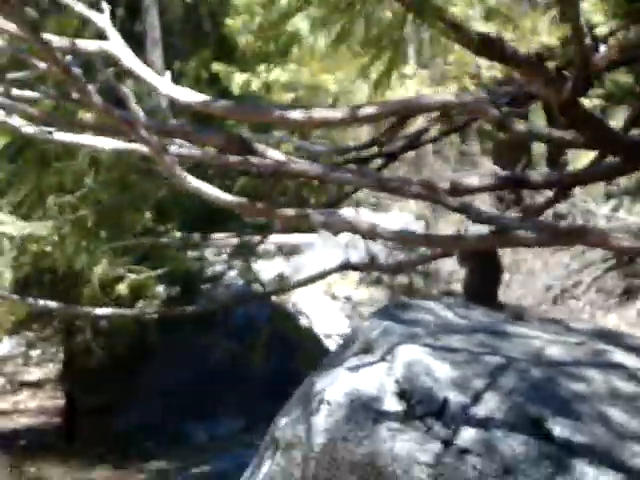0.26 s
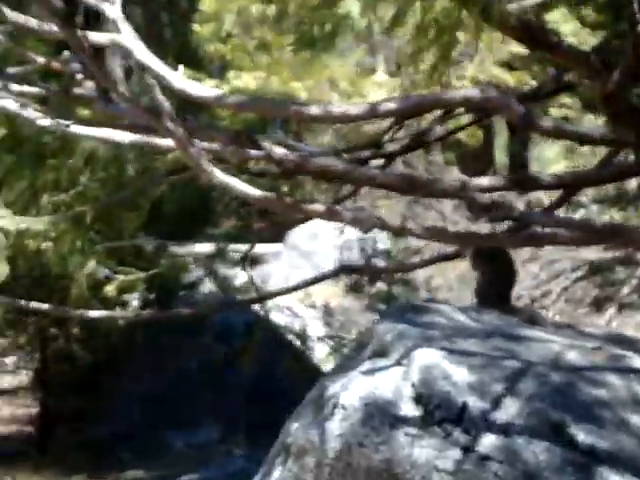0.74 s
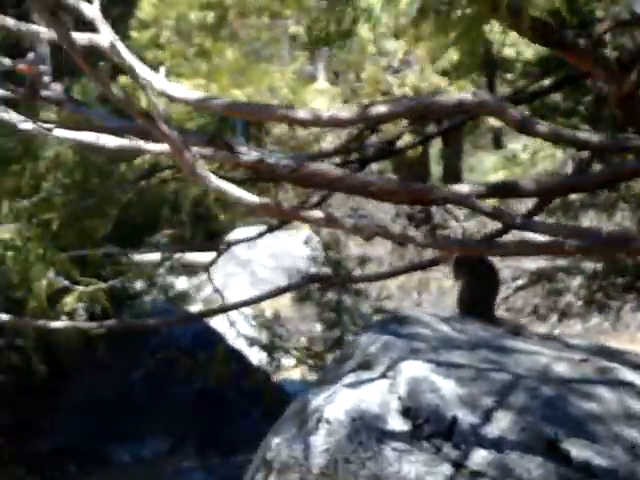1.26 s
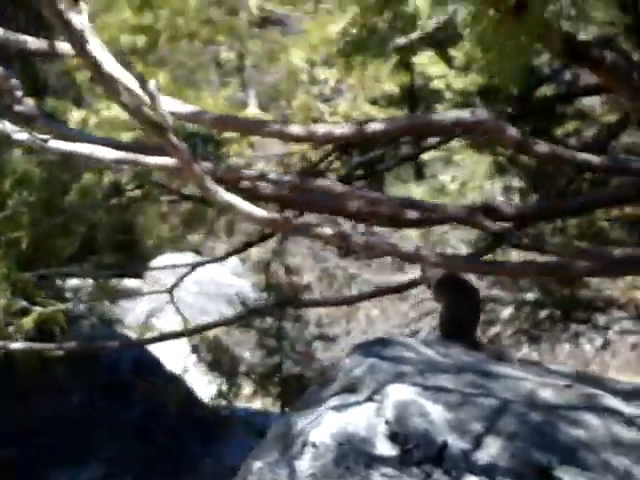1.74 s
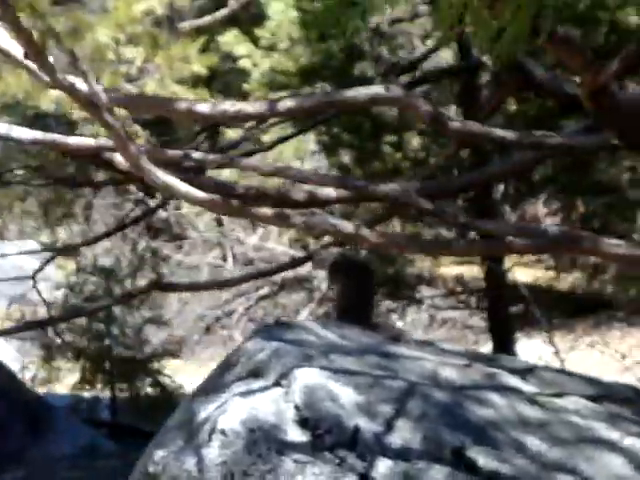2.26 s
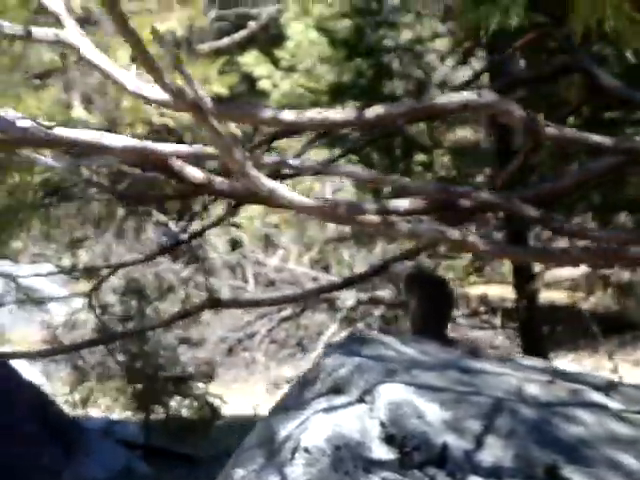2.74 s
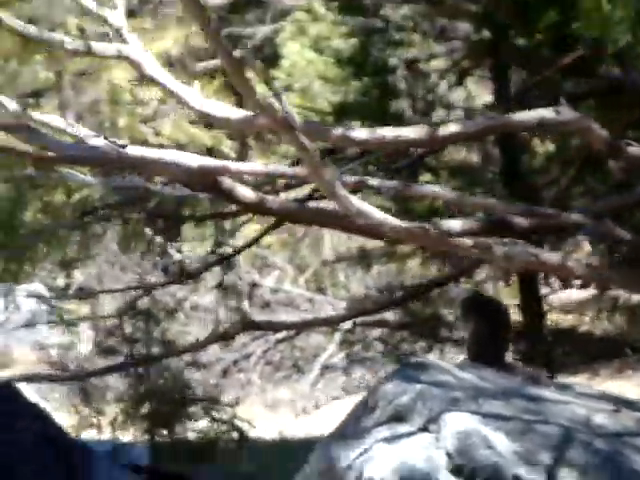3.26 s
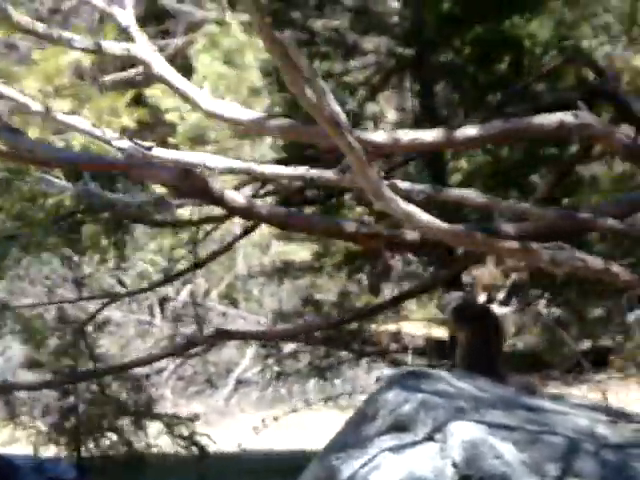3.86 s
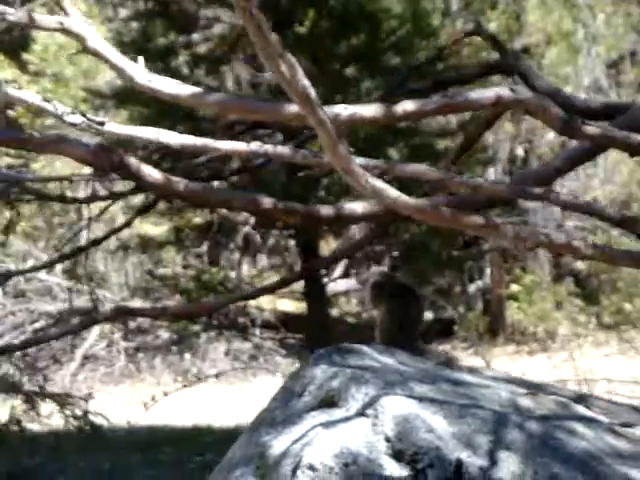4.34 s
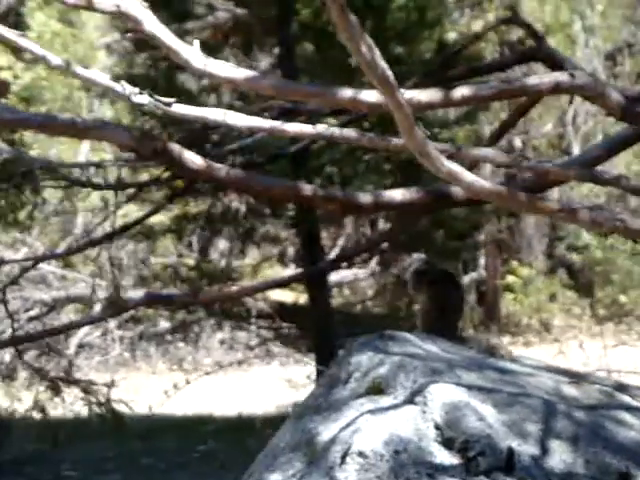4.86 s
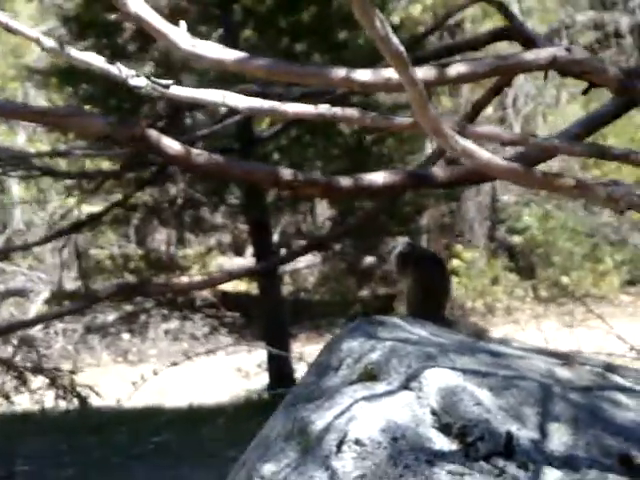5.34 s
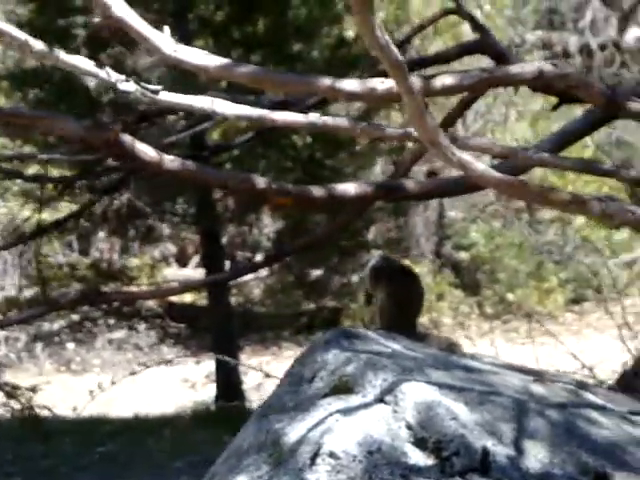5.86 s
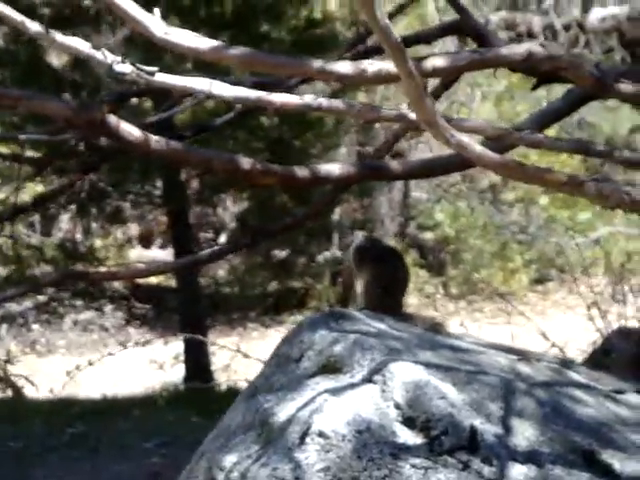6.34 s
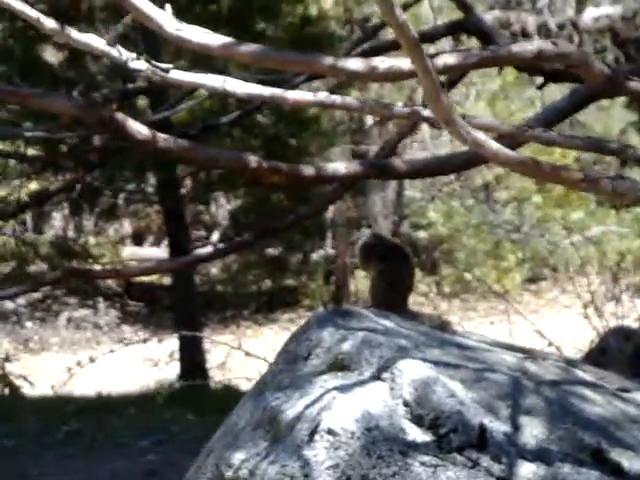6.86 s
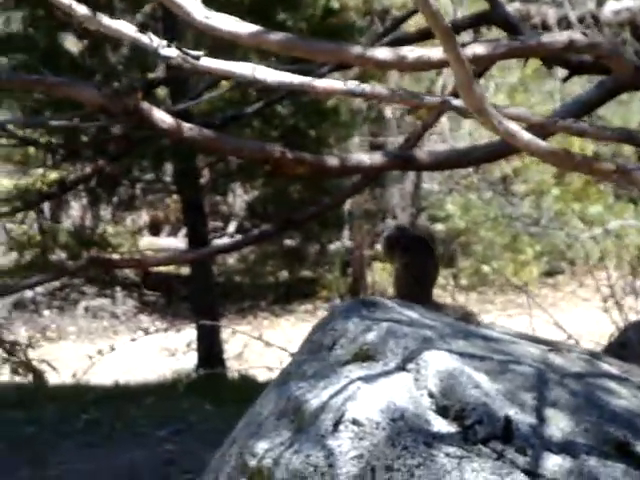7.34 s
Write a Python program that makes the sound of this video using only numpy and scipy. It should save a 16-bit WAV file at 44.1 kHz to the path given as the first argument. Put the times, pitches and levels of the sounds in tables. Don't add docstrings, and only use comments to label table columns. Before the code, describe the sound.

Harsh squirrel chirps come steadily, about every seven tenths of a second, in breezy woods; fingers knock the casing, and far birds scold and caw.

```python
import sys
import numpy as np
from scipy import signal
from scipy.fft import rfft, irfft, next_fast_len
from scipy.io import wavfile
from scipy.ndimage import uniform_filter1d, map_coordinates

SR = 44100
rng = np.random.default_rng(int(sys.argv[2]) if len(sys.argv) > 2 else 0)


def transcribe(u):
    v = np.clip(np.atleast_2d(u).T, -1, 1)
    q = np.round(v * 32767).astype(np.int16)
    wavfile.write(sys.argv[1], SR, q)


def decibels_to_gain(level_db):
    exponent = np.asarray(level_db, float) / 20
    return 10 ** exponent


N = 335160


def unit(x):
    return x / np.sqrt(np.mean(x ** 2) + 1e-20)


def along(points, hz):
    f, value = np.transpose(points)
    return np.interp(np.log(hz + 1), np.log(f + 1), value)


def wobble(rate, size=N):
    knots = rng.standard_normal(size // 40 + 9)
    return map_coordinates(knots, [np.arange(size) * rate / SR], order=2)


def patches(shape, depth_db, size):
    smooth = uniform_filter1d(rng.standard_normal(shape), size[0], 0)
    smooth = uniform_filter1d(smooth, size[1], 1)
    return decibels_to_gain(depth_db * unit(smooth))


def filtered(x, response):
    m = next_fast_len(len(x) + 4096)
    spectrum = rfft(x, m) * response(np.fft.rfftfreq(m, 1 / SR))
    return irfft(spectrum, m)[:len(x)]


def resonances(modes):
    def response(f):
        total = 0
        for k, (centre, width, db) in enumerate(modes):
            peak = 1j * f * width / (centre * centre - f * f + 1j * f * width)
            total = total + (-1) ** k * decibels_to_gain(db) * peak
        return total
    return response


def hoarse(rate, jitter, gating, noise, size=N):
    phase = np.cumsum(rate / SR * np.exp(jitter * wobble(rate, size=size)))
    pulses = np.diff(np.floor(phase), prepend=0) * decibels_to_gain(4.8 * rng.standard_normal(size))
    puffs = rng.standard_normal(size) * np.exp(-gating * (phase % 1))
    share = np.clip(noise, 0, 1)
    return np.sqrt(1 - share) * unit(pulses) + np.sqrt(share) * unit(puffs)


def add(track, s, sound):
    part = track[round(s * SR):][:len(sound)]
    part += sound[:len(part)]


# time in seconds, strength in dB.
BREEZE = [(0.0, -52.5), (3.41, -52), (3.77, -49.5), (4.13, -52), (6.65, -51), (6.88, -52), (7.41, -51.5),
          (7.6, -50)]
# frequency in Hz, density in dB per Hz.
PINES = [(26, -50), (66, -11), (85, -17), (230, -6), (520, -3), (1050, -5.5), (2600, -18), (6000, -28.5)]
# frequency in Hz, density in dB per Hz.
HISS = [(600, -30.5), (2500, -1), (5450, 1.5), (9920, -3.5), (10500, -58)]
HISS_DB = -62


def breeze():
    z = signal.stft(rng.standard_normal(N), nperseg=512)[2]
    patchy = signal.istft(z * patches(z.shape, 1.17, size=(5, 9)), nperseg=512)[1][:N]
    air = filtered(patchy, lambda f: decibels_to_gain(along(PINES, f)))
    hiss = filtered(rng.standard_normal(N), lambda f: decibels_to_gain(along(HISS, f)))
    s, db = np.transpose(BREEZE)
    strength_db = np.interp(np.arange(N) / SR, s, db) + 1.0 + 0.14 * wobble(3.17)
    return decibels_to_gain(strength_db) * unit(air) + decibels_to_gain(HISS_DB) * unit(hiss)


# frequency in Hz, time to fall 60 dB in seconds.
TREES = [(1000, 0.87), (3000, 0.52), (9000, 0.21)]


def forest(x):
    wet, half = np.zeros(N), SR // 2
    for start in range(0, N, half):
        hz, t, z = signal.stft(rng.standard_normal(half), SR, nperseg=256)
        decay = decibels_to_gain(-60 * t / along(TREES, hz)[:, None])
        tail = signal.istft(z * decay, SR, nperseg=256)[1]
        echo = signal.fftconvolve(x[start:start + half], tail / np.linalg.norm(tail))
        add(wet, start / SR + .006, echo)
    return wet


# middle in seconds, level in dB, length in seconds.
CAWS = [
    (4.84, -49, 0.046),
    (5.293, -51.5, 0.19),
    (5.803, -54.5, 0.16),
    (6.258, -54.5, 0.13),
    (6.728, -53, 0.1),
]
# resonance in Hz, width in Hz, level in dB.
CROW = [(1280, 155, 3), (1613, 60, 5)]


def crow():
    t = np.arange(N) / SR
    shape = sum(decibels_to_gain(db) * np.exp(-np.abs(2 * (t - s) / length) ** 3) for s, db, length in CAWS)
    voice = filtered(hoarse(340, .03, 1.5, 0.18), lambda f: resonances(CROW)(f) ** 2)
    return shape * unit(voice)


# start in seconds, peak in dB, ring in Hz, ring length in cycles, crack in dB.
TICKS = [(1.471, -37, 1140, 3.3, -3), (1.4894, -34, 1310, 1.8, -9), (1.5015, -26, 1030, 0.79, -4),
         (1.554, -36, 900, 1.3, -1.5), (1.641, -38, 2100, 3.6, -3), (1.665, -38, 4300, 2.1, -10),
         (1.7951, -10, 1130, 1.86, -22.5), (1.803, -29, 1400, 3.3, -7), (1.835, -37, 1980, 2.4, -9),
         (2.693, -36, 2800, 5.5, -11), (2.729, -41, 815, 4.4, 0), (2.754, -41.5, 2200, 3, -6),
         (2.832, -49, 700, 1.9, 5.5), (4.953, -36.5, 1040, 6.2, -20), (5.561, -37.5, 2400, 2.8, -15),
         (6.358, -46, 1030, 8.2, -16), (6.466, -37, 1110, 3.9, -30)]
# start in seconds, peak in dB, ring in Hz, ring length in cycles.
THUMPS = [(1.4, -43.5, 420, 14), (1.414, -46, 436, 6.5), (2.328, -46, 90, 4), (2.46, -46, 91, 7.5),
          (2.618, -35, 114, 1.5), (3.809, -45, 130, 3.2), (5.16, -40.5, 81, 2.6), (6.485, -40.5, 162, 7),
          (6.504, -38, 400, 3.2)]
SOFT_CRACK_DB = -60


def handling():
    track, t = np.zeros(N), np.arange(SR // 8) / SR
    bumps = [(*row, SOFT_CRACK_DB) for row in THUMPS]
    for s, db, hz, cycles, crack_db in TICKS + bumps:
        u = t * hz / cycles
        ring = np.sin(2 * np.pi * hz * t) * (1 - np.exp(-12 * u)) * np.exp(-3 * u)
        noise = filtered(rng.standard_normal(len(t)), lambda f: resonances([(3300, 4500, 0)])(f) ** 3)
        crack = decibels_to_gain(crack_db - 60 * t / 0.0037) * noise
        thin = filtered(crack - ring, lambda f: (1j * f / (.3 * hz + 1j * f)) ** 3)
        add(track, s - .0003, decibels_to_gain(db + 9.0) * thin)
    return filtered(track, lambda f: (1j * f / (130 + 1j * f)) ** 3)


# start in seconds, length in seconds, level in dB, brightness in dB per octave, beak tuning (1 = rest).
SCOLDS = [
    (3.478, 0.25, -37, -1.5, 1.01),
    (3.825, 0.27, -38.5, 0.5, 0.974),
    (4.198, 0.27, -38, -1.5, 0.97),
    (4.595, 0.25, -39, -2.5, 0.97),
    (4.965, 0.29, -39.5, -2.5, 0.96),
]
# open in Hz, shut in Hz, width in Hz, open level in dB, shut level in dB.
BEAK = [(1930, 2170, 480, -6.5, -7), (2680, 2560, 830, -12, -10.5), (3790, 3290, 390, -10.5, -3.5),
        (4400, 4080, 800, -3, -10), (5000, 4930, 780, -6, -8.5), (5750, 5700, 500, -7, -13),
        (6800, 6400, 1500, -7, -20)]
SWELL_DB, SWELL_SHARE, SWELL_CURVE = 22, .62, 2.1
SHUT_SHARE = 0.79
RELEASE_DB_PER_S = 485


def jay():
    start, size = SCOLDS[0][0] - .05, 2 * SR
    hz, t, z = signal.stft(hoarse(330, 0.59, 0.37, 0.96, size=size), SR, nperseg=512)
    f, power = hz[:, None] + 1, 0
    for s, length, db, bright_db, tuning in SCOLDS:
        since = t + start - s
        to_climb = np.clip(1 - since / (SWELL_SHARE * length), 0, 3)
        release_db = RELEASE_DB_PER_S * np.clip(since - length, 0, 1)
        effort_db = db - SWELL_DB * to_climb ** SWELL_CURVE - release_db
        shut = np.clip(since / (SHUT_SHARE * length), 0, 1)
        for open_hz, shut_hz, width, open_db, shut_db in BEAK:
            centre = tuning * (open_hz + (shut_hz - open_hz) * shut)
            peak = 1 / (1 + ((f - centre ** 2 / f) / width) ** 2) ** 1.59
            tone_db = open_db + (shut_db - open_db) * shut + bright_db * np.log2(centre / 3300)
            power = power + decibels_to_gain(2 * (effort_db + tone_db)) * peak / peak.mean(axis=0)
    edge = 1 / (1 + (1650 / f) ** 8)
    gain = np.sqrt(power) * edge * patches(z.shape, 2.0, size=(3, 22))
    track = np.zeros(N)
    add(track, start, signal.istft(z * gain, SR, nperseg=512)[1])
    return track


# resonance in Hz, width in Hz, level in dB.
THROAT = [(2200, 420, -6.5), (2876, 380, 0.5), (3356, 423, 3), (4096, 590, -1), (5070, 510, -1),
          (5924, 230, -3), (6414, 340, -5), (9300, 2900, -11)]
LOW_EDGE_HZ = 2550


def rasps(events, lead):
    track, t = np.zeros(N), np.arange(SR // 10) / SR
    for s, db, length, bright_db, tuning in events:
        source = hoarse(520, .4, 1.2, .88, size=len(t))

        def voiced(shift):
            throat = resonances([(hz * tuning * shift, width, level) for hz, width, level in THROAT])

            def response(f):
                tilt = decibels_to_gain(bright_db * np.log2(f / 3300 + 0.011))
                mouth = 1 / (1 + (LOW_EDGE_HZ / (f + 1)) ** 6) / (1 + (f / 7000) ** 2)
                return tilt * mouth * throat(f) ** 2
            return unit(filtered(source, response))

        wide, narrow = voiced(1.04), voiced(.94)
        closing = np.clip(t / (1.62 * length), 0, 1)
        sliding = np.sqrt(1 - closing) * wide + np.sqrt(closing) * narrow
        swell = np.clip(t / lead, 0, 1)
        sag = decibels_to_gain(-7 * (t / length) ** 1.12)
        shape = swell ** 1.85 * sag / (1 + np.exp((t - lead - length) / 0.0019))
        spent = 1 / (1 + np.exp((t - 2.4 * length) / .005))
        breath = decibels_to_gain(-23.5) * swell * spent
        add(track, s - lead, decibels_to_gain(db - 4.5) * (shape + breath) * sliding)
    return track


# start in seconds, peak in dB, length in seconds.
CHUCKS = [(0.35, -31, 0.023), (0.403, -45, 0.032), (1.101, -33, 0.027), (1.1513, -38, 0.018),
          (1.842, -29, 0.0094), (1.882, -44.5, 0.023), (2.535, -33.5, 0.019), (2.587, -38, 0.012),
          (3.168, -23, 0.014), (3.228, -41, 0.022), (3.882, -24.5, 0.018), (4.6177, -26, 0.023),
          (5.392, -26.5, 0.018), (5.448, -38, 0.017), (6.1363, -28, 0.023), (6.2016, -31.5, 0.025),
          (6.818, -26, 0.019), (6.889, -35.5, 0.011), (7.5815, -28.5, 0.014)]
CHUCK_BRIGHT_DB, CHUCK_TUNING = -10.5, 0.94


def chucks():
    return rasps([(*row, CHUCK_BRIGHT_DB, CHUCK_TUNING) for row in CHUCKS], lead=0.004)


# time of its top in seconds, level in dB, pitch in Hz, rise in seconds, fall in seconds.
WHISTLES = [(0.288, -24.5, 2930, 0.013, 0.0084), (1.036, -25, 2910, 0.0095, 0.012),
            (1.771, -27, 2850, 0.013, 0.018), (2.463, -26, 2980, 0.0091, 0.019),
            (3.1, -23.5, 2986, 0.017, 0.01), (3.809, -20.5, 3115, 0.028, 0.014),
            (4.542, -23.5, 3306, 0.024, 0.015), (5.32, -27.5, 2927, 0.036, 0.015),
            (6.067, -29, 3004, 0.04, 0.022), (6.733, -25.5, 3225, 0.043, 0.013),
            (7.512, -25.5, 2967, 0.014, 0.01)]
ROUGHNESS = [.02, .14, .14, .2, .02, .1, .14, .18, .2, .28, .1]
# multiple of the pitch, level in dB.
OVERTONES = [(2, -19.5), (3, -29)]


def whistles():
    track, t = np.zeros(N), np.arange(-SR // 25, SR // 20) / SR
    size = len(t)
    for (s, db, hz, rise, fall), rough in zip(WHISTLES, ROUGHNESS):
        climb = .3 * (1 - 3 * rough) * np.clip(-t / .021, 0, 1.3) ** 1.8
        sag = .075 * np.clip(t / .022, 0, 2) ** 1.3
        pitch = hz * (1 - climb - sag) * (1 + .1 * rough * wobble(500, size=size))
        phase = 2 * np.pi * np.cumsum(pitch) / SR
        tone = np.sin(phase)
        for k, level in OVERTONES:
            ragged = decibels_to_gain(3 * wobble(250, size=size)) * np.sin(k * phase + .9 * wobble(500, size=size))
            tone = tone + decibels_to_gain(level) * ragged
        rising, falling = np.exp(-np.abs(t / rise) ** 1.2), np.exp(-np.abs(t / fall) ** 2.1)
        swell = np.where(t < 0, rising, falling) * np.clip(1 + t / .03, 0, 1) ** .5
        flutter_db = 13 * rough * wobble(300, size=size)
        add(track, s + t[0], decibels_to_gain(db + flutter_db) * swell * tone)
    return track


# start in seconds, peak in dB, length in seconds, brightness in dB per octave, throat tuning (1 = rest).
RASPS = [(0.2450, -14.5, 0.028, -7, 0.983), (0.9937, -17, 0.037, -7, 0.948), (1.7316, -14, 0.03, -8, 0.96),
         (2.4264, -14.5, 0.035, -6.5, 0.936), (3.0577, -12.5, 0.025, -6, 0.966),
         (3.771, -14, 0.034, -6.5, 1.005), (4.5024, -14.5, 0.037, -7, 1.033),
         (5.2792, -18, 0.039, -3.5, 1.04), (6.0304, -13, 0.028, -8, 1.033),
         (6.7043, -14, 0.033, -6.5, 0.955), (7.4696, -16.5, 0.036, -4, 0.987)]


def barks():
    return rasps(RASPS, lead=0.0075)


FOREST_DB, JAY_FAR_DB = -19, 11


def scene():
    squirrel = barks() + chucks() + whistles()
    bird = jay()
    tail = decibels_to_gain(FOREST_DB) * forest(squirrel + decibels_to_gain(JAY_FAR_DB) * bird)
    return (squirrel + bird + tail + crow() + handling() + breeze())[None]


# start in seconds, end in seconds, low edge in Hz,
# high edge in Hz.
GAPS = [
    (.231, .239, 5500, 11000),
    (1.709, 1.724, 2800, 11000),
    (2.395, 2.417, 2200, 7300),
    (3.036, 3.051, 2500, 11000),
    (4.482, 4.496, 4300, 11000),
    (6.0, 6.021, 2900, 7200),
    (6.678, 6.695, 2500, 10000),
    (7.434, 7.46, 2500, 7300),
]


def starved(x):
    hz, t, z = signal.stft(x, SR, nperseg=256)
    band, block = (hz / 520).astype(int), (t / .0116).astype(int)
    f = hz[:, None]
    loud_db = 10 * np.log10(uniform_filter1d(np.sum(np.abs(z) ** 2, axis=0), 31) + 1e-12)
    treble = np.clip((f - 3500) / 2500, 0, 1) + np.exp(-((f - 5700) / 600) ** 2)
    chance = treble * (0.11 + 0.0093 * np.clip(loud_db + 55.5, 0, 12))
    weak = 20 * np.log10(uniform_filter1d(np.abs(z), 5, axis=1) + 1e-9) < loud_db - 24
    lost = weak & (rng.random((SR // 500, N // 400))[band][:, block] < chance)
    for start, end, low_hz, high_hz in GAPS:
        lost = lost | (f > low_hz) & (f < high_hz) & (t > start) & (t < end)
    return signal.istft(z * np.where(lost, decibels_to_gain(-31), 1), SR, nperseg=256)[1][:N]


def top_cut(x):
    return signal.sosfilt(signal.butter(12, 10070, fs=SR, output="sos"), x)


TOP_HZ = 10080


def record(dry):
    clipped = dry[0] / (1 + np.abs(dry[0] / .222) ** 12) ** (1 / 12)
    mix = filtered(starved(clipped), lambda f: (f < TOP_HZ) * 1j * f / (40 + 1j * f))
    return top_cut(mix[None])


dry = scene()
out = record(dry)
transcribe(out)
```